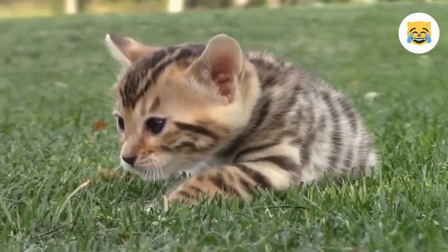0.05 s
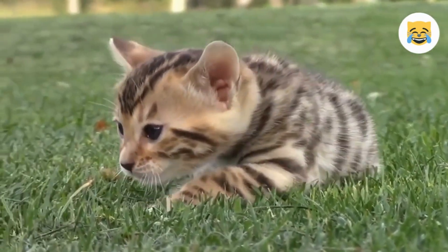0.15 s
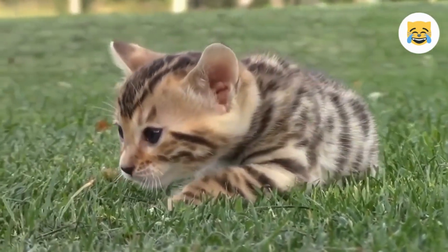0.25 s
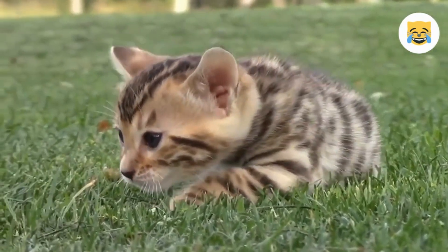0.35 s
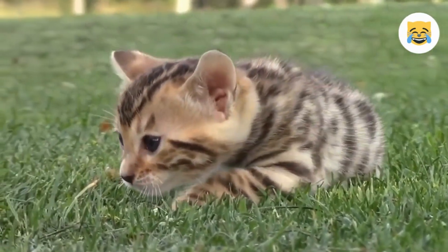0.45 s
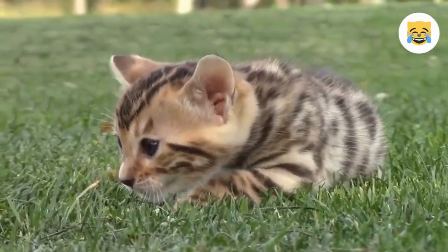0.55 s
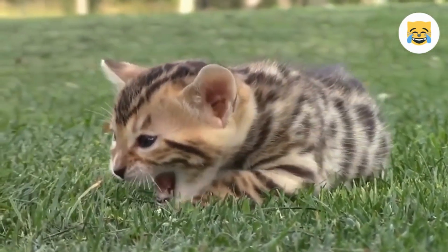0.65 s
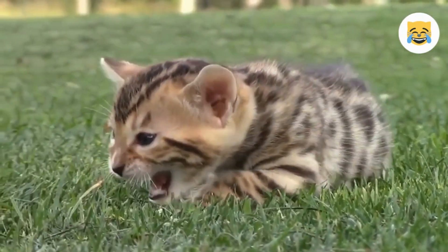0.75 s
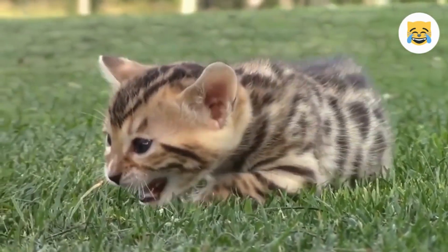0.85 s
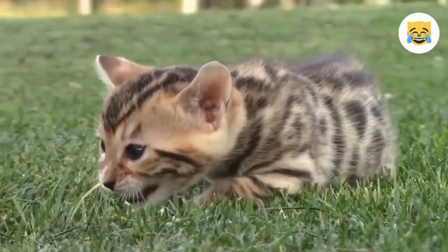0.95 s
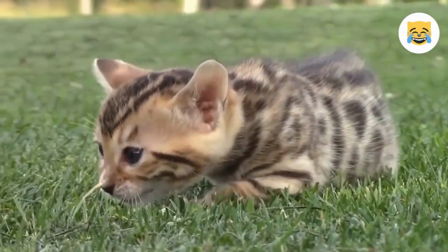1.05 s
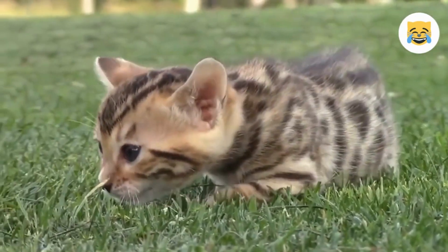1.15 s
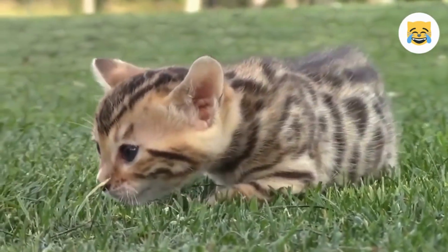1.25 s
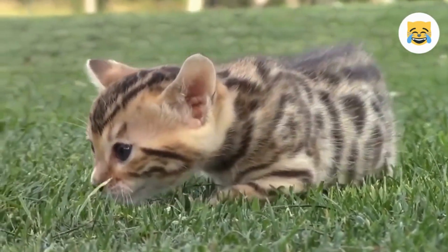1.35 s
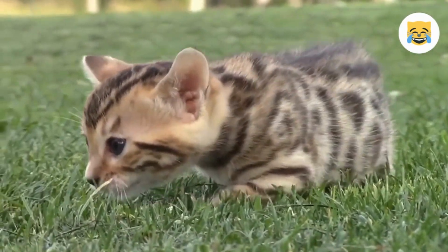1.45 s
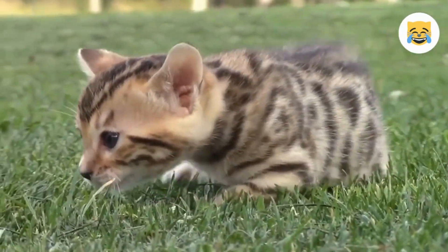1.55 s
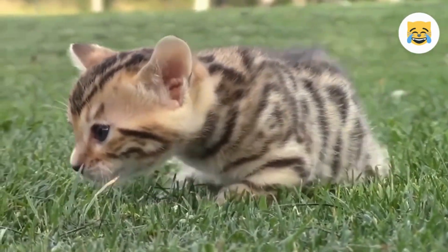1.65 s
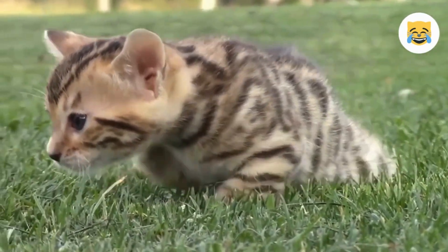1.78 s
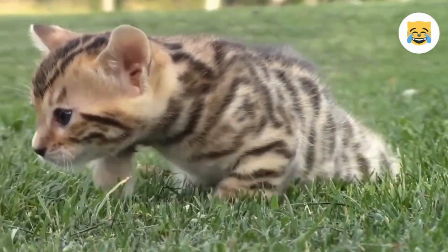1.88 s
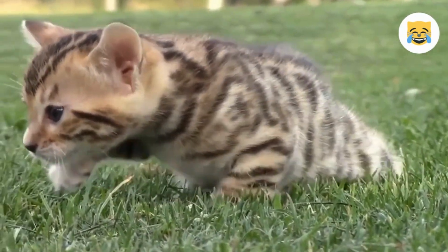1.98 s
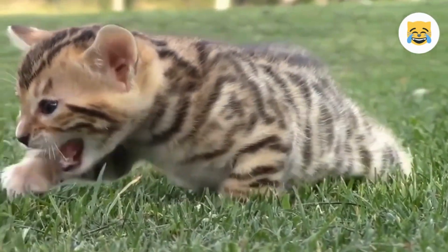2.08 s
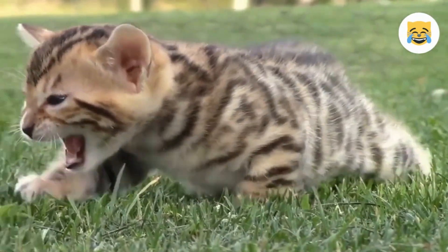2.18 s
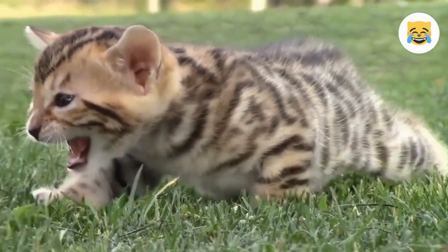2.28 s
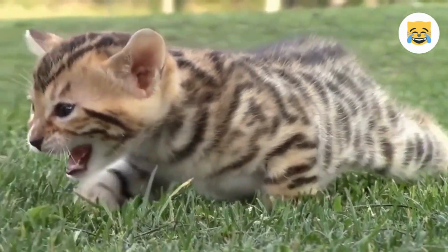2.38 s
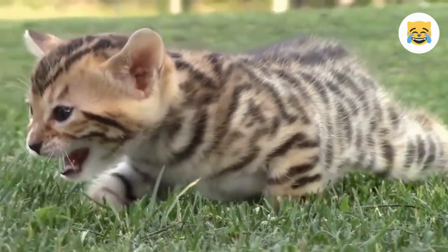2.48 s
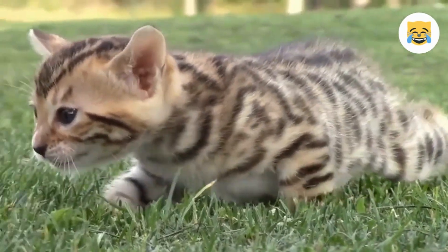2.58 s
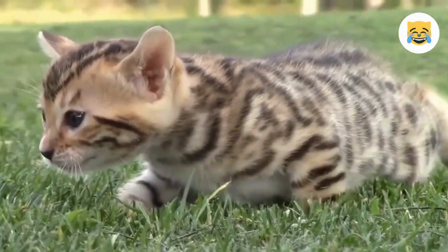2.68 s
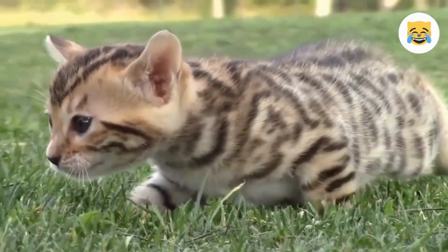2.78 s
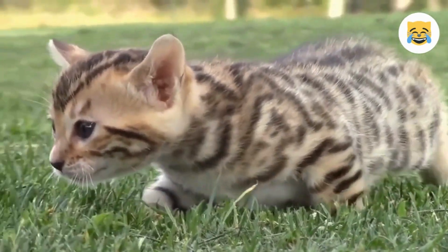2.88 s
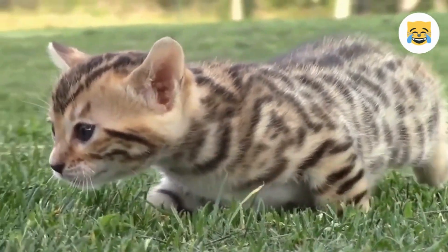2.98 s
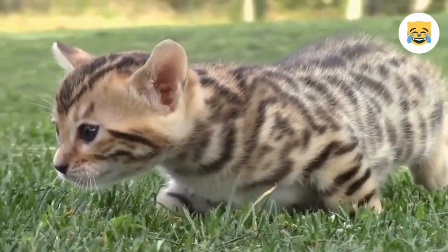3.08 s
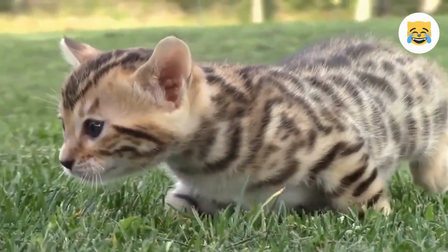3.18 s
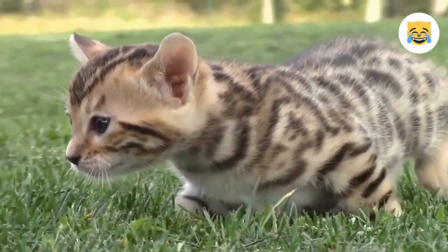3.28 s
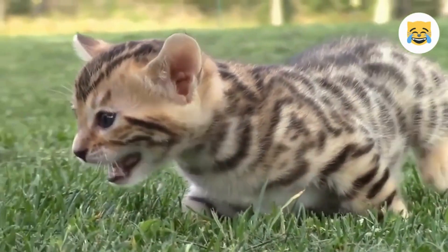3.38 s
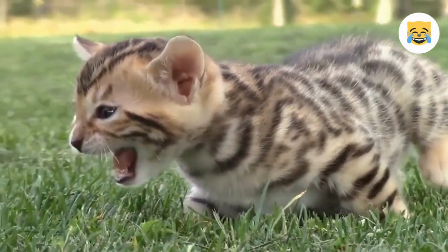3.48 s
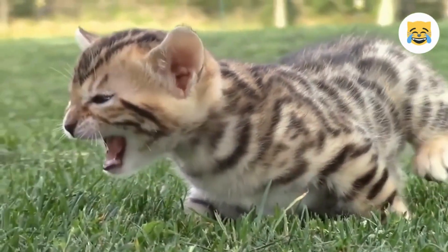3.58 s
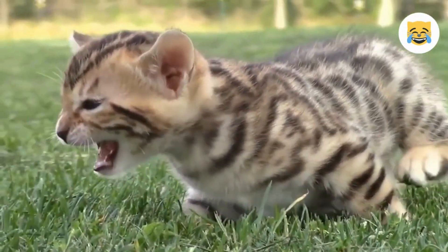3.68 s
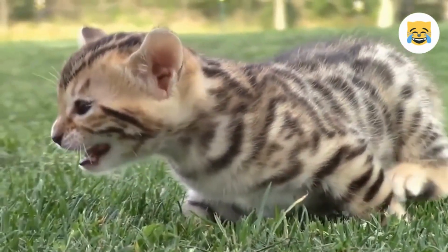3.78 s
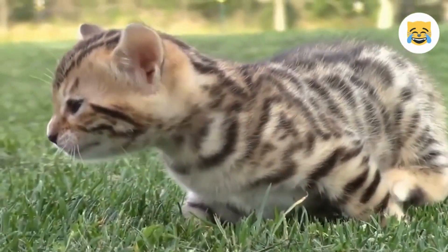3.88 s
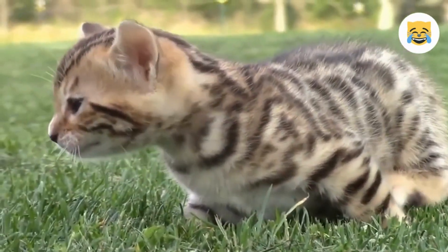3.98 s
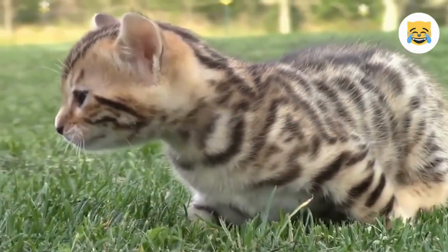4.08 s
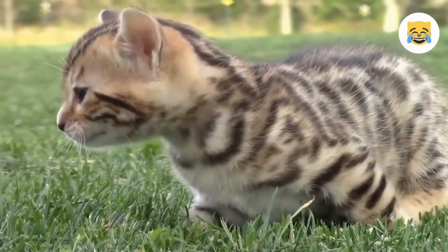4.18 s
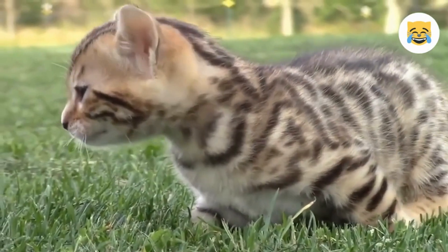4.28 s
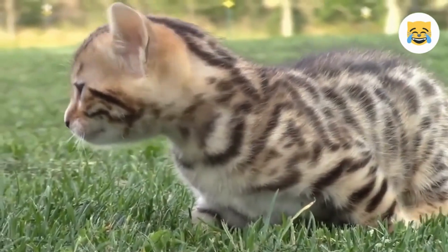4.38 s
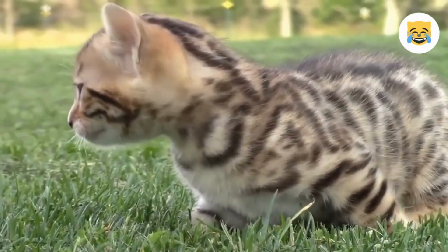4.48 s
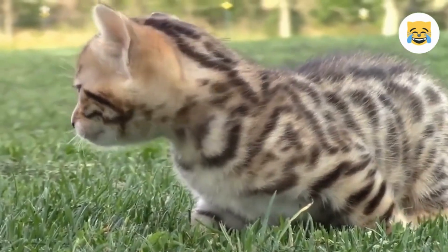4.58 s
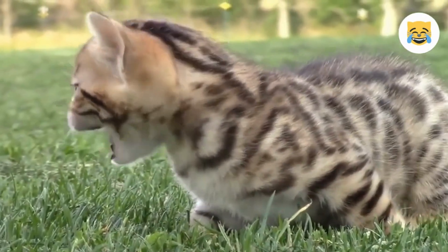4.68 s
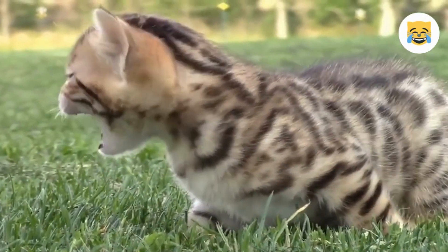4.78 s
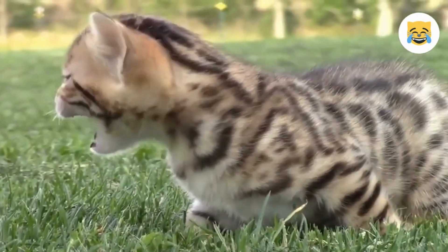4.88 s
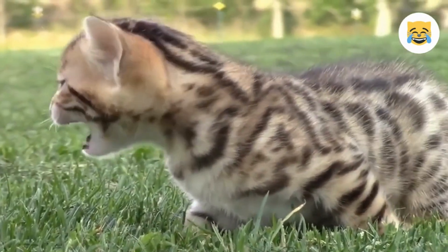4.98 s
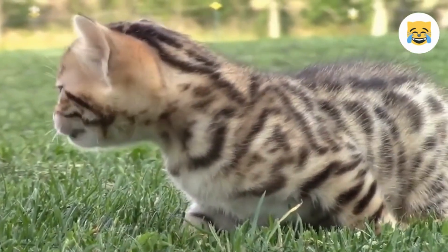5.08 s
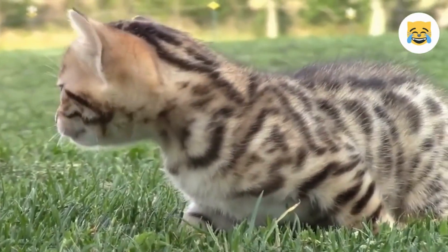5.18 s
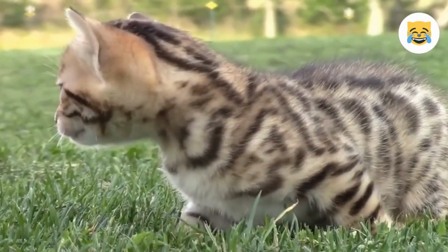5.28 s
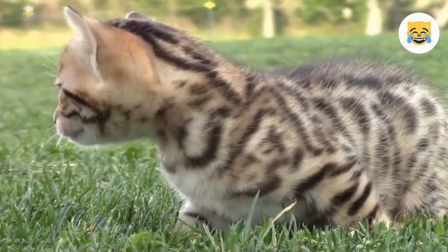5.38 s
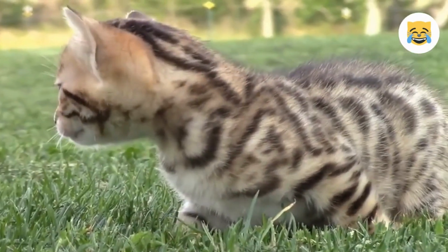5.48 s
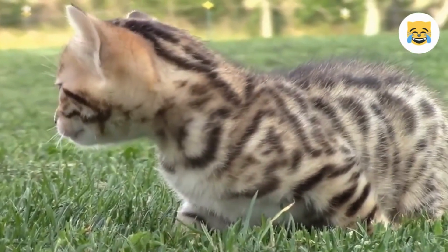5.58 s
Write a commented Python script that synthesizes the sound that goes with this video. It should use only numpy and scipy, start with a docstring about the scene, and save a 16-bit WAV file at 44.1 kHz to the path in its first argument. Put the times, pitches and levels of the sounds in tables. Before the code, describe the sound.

Outdoors, a tiny cat mews shrilly four times near the microphone, the last cracking, with quiet traffic rumble, a cooing dove and small birds behind.

```python
"""On a lawn, a kitten meows four times close by, over far traffic, an engine drone, a dove and small birds with echoes.
The kitten's voice is nearly a pure tone: a mouth resonance falls through each call and lifts first the
second partial (twice the pitch), then the first. Breath noise, slips of the folds and a crack roughen it.
Birds and dove are gliding or wavering sines, apart from one buzzy whistle and one hoarse cheep of filtered noise.
Traffic is random noise with a shaped, drifting spectrum, and the drone is a narrow band of noise."""
import sys
import numpy as np
from scipy import signal
from scipy.io import wavfile
from scipy.ndimage import uniform_filter1d

SR = 44100
rng = np.random.default_rng(int(sys.argv[2]) if len(sys.argv) > 2 else 0)


def generate_wav(sig):
    """Save sig (samples, or channels by samples) to the path in sys.argv[1] as 16-bit PCM at SR."""
    pcm = np.round(np.clip(np.atleast_2d(sig).T, -1, 1) * 32767).astype(np.int16)
    wavfile.write(sys.argv[1], SR, pcm)


N = 248724


def amp(db):
    """Gain of a level in dB."""
    return 10 ** (np.asarray(db) / 20)


def evened(x):
    """Scales to rms 1 (an average strength of one)."""
    return x / np.sqrt(np.mean(x ** 2) + 1e-20)


def read(points, hz):
    """Reads a spectrum on a log-frequency axis."""
    f, value = np.transpose(points)
    return np.interp(np.log(hz + 1), np.log(f + 1), value)


def curves_at(rows, t):
    """Reads the columns of a curve table at the times t."""
    s, *columns = np.transpose(rows)
    return [np.interp(t, s, c) for c in columns]


def unroll(rows):
    """Sample times and columns of a curve table."""
    t = np.arange(max(rows[0][0], 0), rows[-1][0], 1 / SR)
    return (t, *curves_at(rows, t))


def add(mix, s, sound):
    """Mixes a sound in at a time."""
    part = mix[max(round(s * SR), 0):][:len(sound)]
    part += sound[:len(part)]


def resonate(x, hz, width):
    """Shifts the curve hz down to zero, smooths twice, and shifts back: a steep moving resonance."""
    turn = np.exp(2j * np.pi * np.cumsum(hz * np.ones(len(x))) / SR)
    r = np.exp(-np.pi * width / SR)
    smooth = signal.lfilter([(1 - r) ** 2], [1, -2 * r, r * r], x / turn)
    return 2 * (turn * smooth).real


def noise_band(count, hz, width):
    """Noise of rms 1 through a resonance at hz."""
    return evened(resonate(rng.standard_normal(count), hz, width))


def wander(count, seconds):
    """Slow chance of rms 1."""
    size = max(round(seconds * SR), 1)
    return evened(uniform_filter1d(uniform_filter1d(rng.standard_normal(count), size), size))


def tone(hz, db):
    """A sine of rms level db along a pitch curve."""
    return np.sqrt(2) * amp(db) * np.sin(2 * np.pi * np.cumsum(hz) / SR)


# colour of the traffic, before overall leveling: [f/Hz, level/dB per Hz]
TRAFFIC_COLOUR = [(15, -68.5), (25, -36.5), (48, -34.5), (77, -11.5), (164, -6), (221, -4.5), (379, -8),
                  (523, -5.5), (567, -10), (826, -15.5), (1200, -22.5), (5150, -32), (7500, -37),
                  (15500, -54)]
# width of the traffic, difference between the ears against what they share: [f/Hz, level/dB]
TRAFFIC_WIDTH = [(60, -18), (240, -20), (950, -11), (3770, -6.5), (15000, -5.5)]
# loudness of the traffic: [t/s, level/dB]
TRAFFIC_LEVEL = [(0, -50), (2, -49.5), (4.999, -49), (5.64, -47.5)]


def traffic(patchy_db=2.5):
    """Random short-time spectra with drifting patches; the ears share most of the bass, less of the treble."""
    frames, hz = N // 1024 + 5, np.fft.rfftfreq(4096, 1 / SR)
    a, b, c, d, patches = rng.standard_normal((frames, 2049, 5)).T
    patches = uniform_filter1d(patches, size=20, axis=0)  # across frequency
    patches = evened(uniform_filter1d(patches, size=4, axis=1))  # across time
    mid = a + 1j * b
    side = (c + 1j * d) * amp(read(TRAFFIC_WIDTH, hz))[:, None]
    colour = amp(read(TRAFFIC_COLOUR, hz)[:, None] + patchy_db * patches)
    z = np.array([mid + side, mid - side]) * colour
    rumble = signal.istft(z, nperseg=4096, noverlap=3072)[1][:, :N]
    level_db, = curves_at(TRAFFIC_LEVEL, np.arange(N) / SR)
    return amp(level_db) * evened(rumble)


# far engine: [t/s, f/Hz, level/dB]
ENGINE = [(0, 214, -49), (.7, 222, -56.5), (1.2, 227, -66), (3.3, 225.9, -64), (5.64, 223.8, -52)]


def engine_drone():
    """A far engine: a narrow band of noise that follows a slow pitch curve."""
    out = np.zeros(N)
    t, hz, db = unroll(ENGINE)
    add(out, t[0], amp(db) * noise_band(len(t), hz, 45))
    return out


# soft coos, before their swell and wavering: [t/s, length/s, f/Hz, level/dB]
COOS = [(0, 0.96, 515, -61), (.7, 0.34, 515, -53.5), (1.3, 0.19, 512, -54.5), (1.55, 0.48, 514, -45.5),
        (2.3, 0.35, 514, -51), (1.899, 0.9, 476, -59), (3.4, 0.54, 476, -54.5), (5.149, 0.22, 430, -51.5)]


def dove():
    """Coos: sines that swell and fade while pitch and level waver a little."""
    out = np.zeros(N)
    for s, length, hz, db in COOS:
        swell = np.hanning(round(length * SR))
        wavering_hz = hz * (1 + .006 * wander(len(swell), 0.057))
        wavering_db = db + 1.3 * wander(len(swell), 0.026)
        add(out, s, swell * tone(wavering_hz, wavering_db))
    return out


# Bird levels below are before fades, flutter and placing between the ears.
# twitter, notes that rise and fall: [t/s, length/s, top f/Hz, level/dB]
ARCHES = [(.212, .018, 3730, -59), (1.791, 0.013, 3970, -61), (3.394, 0.014, 3830, -57.5),
          (0.137, 0.06, 4830, -58.5), (0.228, 0.045, 4440, -56.5), (1.085, 0.064, 4590, -60.5),
          (1.17, .035, 4298, -53.5), (1.643, 0.019, 3750, -57), (2.512, 0.026, 4110, -53.5),
          (2.576, 0.0461, 4930, -57.5), (2.66, 0.037, 3980, -58), (5.026, 0.039, 4210, -54.5)]
ARCH_FOOT_HZ, ARCH_SKEW = 3550, 1.35  # a skew above 1 puts the top after the middle
# a high bird's falling notes: [t/s, level/dB]
HIGH_NOTES = [(.364, -64), (.629, -56), (0.827, -54.5), (1.024, -54.5), (1.211, -56)]
HIGH_S, HIGH_START_HZ, HIGH_END_HZ = .05, 8690, 7420
# faint level bird notes: [t/s, length/s, f/Hz, level/dB]
LEVEL_NOTES = [(1.548, 0.041, 4630, -64), (1.573, 0.014, 5170, -59), (2.34, .09, 4230, -65.5),
               (4.472, 0.15, 4000, -69.5)]
# twitter, quick falling strokes: [t/s, start f/Hz, level/dB]
STROKES = [(1.747, 5100, -63), (1.803, 5280, -60), (1.815, 4630, -73), (3.349, 5020, -61),
           (3.36, 5440, -58.5), (3.402, 4990, -65.5), (3.416, 5430, -59.5), (3.426, 4945, -60),
           (5.069, 4960, -56), (5.077, 5050, -60), (5.115, 4890, -56.5), (5.131, 5210, -58),
           (5.142, 4900, -55)]
STROKE_S, STROKE_FALL = .016, .74  # length; end pitch as a share of the start


def twitter():
    """Small birds: near-sine notes that arch, fall or stay level, with a fluttering strength."""
    notes = []
    for s, length, top_hz, db in ARCHES:
        arch = np.sin(np.pi * np.linspace(0, 1, round(length * SR)) ** ARCH_SKEW)
        notes.append((s, ARCH_FOOT_HZ + (top_hz - ARCH_FOOT_HZ) * arch, db))
    for s, db in HIGH_NOTES:
        notes.append((s, np.geomspace(HIGH_START_HZ, HIGH_END_HZ, round(HIGH_S * SR)), db))
    for s, length, hz, db in LEVEL_NOTES:
        notes.append((s, np.full(round(length * SR), hz), db))
    for s, hz, db in STROKES:
        notes.append((s, np.geomspace(hz, STROKE_FALL * hz, round(STROKE_S * SR)), db))
    out = np.zeros(N)
    for s, hz, db in notes:
        flutter = 1 + 0.4 * wander(len(hz), 0.0014)
        add(out, s, tone(hz, db) * flutter * signal.windows.tukey(len(hz), .7))
    return out


# trill of paired pips: s = first t/s, every = t/s between pairs, pair = t/s within a pair,
# first_hz and last_hz = middle f/Hz of the first and last pips
TRILL = dict(s=1.2935, every=.0645, pair=.015, first_hz=6500, last_hz=6300)
# each pair of the trill: [level/dB]
PAIR_LEVELS = [-52, -57, -61, -53, -54.5, -56]


def trill():
    """Pairs of short pips; each pip slides up by three percent."""
    out = np.zeros(N)
    pitches = np.linspace(TRILL["first_hz"], TRILL["last_hz"], len(PAIR_LEVELS))
    for k, hz in enumerate(pitches):
        pip = tone(np.linspace(.985 * hz, 1.015 * hz, round(0.014 * SR)), PAIR_LEVELS[k])
        for late in (0, TRILL["pair"]):
            add(out, TRILL["s"] + k * TRILL["every"] + late, pip * np.hanning(len(pip)))
    return out


# one long buzzy note: [t/s, f/Hz, level/dB]
WHISTLE = [(1.68, 6900, -62), (1.72, 7100, -64.5), (1.9, 7320, -71.5), (2.12, 7370, -70)]


def buzzy_whistle():
    """Noise through a narrow resonance that follows the pitch of the note."""
    out = np.zeros(N)
    t, hz, db = unroll(WHISTLE)
    add(out, t[0], amp(db) * noise_band(len(t), hz, 250) * signal.windows.tukey(len(t), .1))
    return out


def garden(x, t60=0.28):
    """Echoes from hedges and walls: a noise tail, other for each ear, that dies by 60 dB in t60 seconds."""
    t = np.arange(SR // 2) / SR
    tail = rng.standard_normal((2, len(t))) * amp(-60 * t / t60) * (t > .006)
    return signal.fftconvolve(x[None], tail / np.linalg.norm(tail[0]), axes=1)[:, :N]


def tent(octaves, nearing_db, leaving_db):
    """Loss in dB at a distance in octaves before or after a resonance."""
    return np.where(octaves < 0, nearing_db * octaves, -leaving_db * octaves)


# the folds slip to another setting and stay there: [t/s, pitch factor, level step/dB]
SLIPS = [(.903, 0.99, 0), (2.391, 1.0, 2), (3.707, 1.0085, 0.5), (1.001, 1.052, -5.5), (1.03, 0.93, 0),
         (1.043, 1.106, -5), (1.071, 0.88, 5), (1.126, 0.931, -2), (2.228, 0.97, 2.5), (2.633, 0.89, 4)]
SLIP_S = .003


def slip_folds(t, hz, effort_db):
    """Steps pitch and effort at each slip that falls inside this meow."""
    for s, factor, step_db in SLIPS:
        slipped = np.clip((t - s) / SLIP_S + .5, 0, 1) * (s > t[0])
        hz, effort_db = hz * factor ** slipped, effort_db + step_db * slipped
    return hz, effort_db


# the high partials: [partial number, level/dB against the swell]
HIGH_PARTIALS = [(5, -11), (6, -1), (7, 1.5), (8, -12)]
# lights each high partial that crosses it: [f/Hz, width/Hz, level/dB against the swell]
THROAT = (8300, 600, 3)
SHINE_DB_PER_S = 190  # the high partials swell to a top and fade
FAN_TILT_DB = -5  # dB per partial in the rich opening


def high_partials(t, hz, effort_db, since, high_s, high_db, fan, smear):
    """Partials that swell once and glow in a throat resonance, each with a halo of breath."""
    out = np.zeros(len(t))
    throat_hz, throat_width, throat_db = THROAT
    for k, partial_db in HIGH_PARTIALS:
        throat = amp(throat_db + effort_db - effort_db.max())
        throat = throat / (1 + (2 * (k * hz - throat_hz) / throat_width) ** 2) ** 2
        shine = throat + amp(-SHINE_DB_PER_S * abs(t - high_s))
        shine = shine * amp(high_db + partial_db + 4.5 * wander(len(t), .012))
        shine = shine * (1 - np.exp(-(since / .009) ** 2))  # gone for a moment at the crack
        shine = shine + fan * amp(FAN_TILT_DB * (k - 2))
        out += shine * smear[k - 3] * tone(k * hz, 0)
        out += shine * .3 * noise_band(len(t), k * hz, 900)
    return out


# strong and weak cycles alternate: [t/s, length/s, level/dB of the line at 3/2 of the pitch, before its gate]
DOUBLING = [(0.897, 0.023, -54), (2.207, 0.028, -52), (3.537, 0.073, -56), (4.794, .12, -48.5)]


def alternating_cycles(t, hz):
    """Strong and weak cycles in turn give lines half-way between the partials."""
    out = np.zeros(len(t))
    for s, length, db in DOUBLING:
        u = (t - s) / length
        gate = np.clip(u * 5, 0, 1) * np.clip((1 - u) * 4, 0, 1)
        if gate.any():
            lines = tone(3 * hz / 2, db) + tone(5 * hz / 2, db - 11)
            out += gate * lines * (.8 + 0.14 * wander(len(t), 0.002))
    return out


# the voice cracks and a lower vibration sets in, levels before its roughness:
# [t/s, f/Hz, level/dB, level/dB of its sum tone with the voice]
BREAK = [(4.931, 995, -33.5, -33), (4.942, 869.5, -29.5, -35.5), (4.97, 869, -34.5, -40.5),
         (5.004, 857, -36.5, -48.5), (5.022, 857.6, -45.5, -51)]


def lower_vibration(t, hz):
    """A second vibration of the voice, with its sum and difference tones, all ragged."""
    low_hz, low_db, sum_db = curves_at(BREAK, t)
    lower = tone(low_hz, low_db) + tone(hz - low_hz, low_db - 24)
    lower = lower + tone(hz + low_hz, sum_db) + tone(2 * hz - low_hz, sum_db - 2.5)
    lower = lower + tone(2 * hz + low_hz, sum_db - 18.5)
    ragged = 1 + 0.25 * wander(len(t), 0.0017)
    return lower * ragged * np.clip((t - BREAK[0][0]) / 0.0028, 0, 1) * (t < BREAK[-1][0])


# the tone breaks off for an instant with a snap: [t/s, f/Hz, level/dB before its fade]
CRACK = (4.937, 1900, -29)
NEARING_DB_PER_OCT, LEAVING_DB_PER_OCT = 29, 24.5  # lift of the first partial around the resonance
LET_GO_DB, LET_GO_PITCH = -7.5, 1.0204  # step as the resonance leaves the second partial
SETTLE_DB = -13.5  # step of the second partial as the resonance meets the first
SECOND_GROWTH = 1.3  # dB of resting second partial for each dB of effort
THIRD_DB, FOURTH_DB = -49, -10  # third below the first; fourth below the third
THIRD_DB_PER_OCT = 13.5
FAN_S = .11  # length of the opening of a meow, rich in partials


def meow(rows, mouth):
    """Partials on one pitch curve, weighed by a mouth resonance that falls one octave, plus breath."""
    t, hz, effort_db = unroll(rows)
    (second_s, first_s, second_top_db, rise_db, fall_db, resting_db, lift_db, breath_db, third_db,
     fan_second_db, fan_db, high_s, high_db) = mouth
    count = len(t)
    hz = uniform_filter1d(hz, round(.012 * SR), mode="nearest")  # muscles round the turns of pitch
    hz, effort_db = slip_folds(t, hz, effort_db)
    fallen = (t - second_s) / (first_s - second_s)  # octaves the resonance has fallen
    let_go = np.clip((t - second_s) / (2 * SLIP_S) + .5, 0, 1)
    hz = hz * LET_GO_PITCH ** let_go * (1 + .001 * wander(count, .004))  # slight unsteadiness of the folds
    since = t - CRACK[0] - .0012
    restart = (since > 0) * np.exp(-np.maximum(since, 0) / 0.0017)
    hz = hz * (1 + 0.1 * restart)  # the tone restarts sharp

    lift = 1 + amp(lift_db + tent(fallen - 1, NEARING_DB_PER_OCT, LEAVING_DB_PER_OCT))
    first_db = uniform_filter1d(effort_db + 20 * np.log10(lift), round(0.0056 * SR), mode="nearest")
    first_db = first_db - 10.0 * np.exp(-(since / 0.00096) ** 2)  # brief dip at the crack
    opening = np.sin(np.pi * np.clip((t - t[0]) / FAN_S, 0, 1))
    fan = amp(fan_db) * opening

    near_second_db = uniform_filter1d(tent(fallen, rise_db, fall_db), round(.009 * SR), mode="nearest")
    settle_db = SETTLE_DB * np.clip((t - first_s) / (5 * SLIP_S) + 0.68, 0, 1)
    second = amp(second_top_db + near_second_db + LET_GO_DB * let_go + settle_db)
    resting = amp(resting_db + SECOND_GROWTH * (effort_db - effort_db.max()))
    # the resting part is opposite in phase, so the partial dips where the two match
    second = second - resting + amp(fan_second_db) * opening
    third = amp(third_db + tent(fallen, THIRD_DB_PER_OCT, THIRD_DB_PER_OCT) + LET_GO_DB * let_go)
    third = third + amp(first_db + THIRD_DB) + fan

    out = tone(hz, .2 * wander(count, .006) + first_db)
    out += second * tone(2 * hz, .9 * wander(count, .004))
    smear = .7 + .5 * np.array([wander(count, .003) for _ in range(6)])  # breath blurs the weak partials
    out += third * smear[0] * tone(3 * hz, 0)
    fourth = tone(4 * hz, FOURTH_DB + 3.0 * wander(count, .015))
    out += third * smear[1] * np.clip(hz / 1450, 0, 1) ** 3 * fourth
    out += high_partials(t, hz, effort_db, since, high_s, high_db, fan, smear)
    out += amp(.5 * first_db - 61) * noise_band(count, 5700, 6000)  # air noise grows with effort
    out += alternating_cycles(t, hz) + lower_vibration(t, hz)
    breath = noise_band(count, 2 * hz / 2 ** np.clip(fallen, 0, 1), 520)  # heard in the resonance
    out += amp(breath_db) * breath * np.sin(np.pi * np.clip((fallen + 0.48) / 1.9, 0, 1)) ** 4
    return t[0], out * signal.windows.tukey(count, .03)


# air past the teeth as the mouth opens: [t/s, length/s, level/dB before its swell]
HISS = [(2.136, 0.13, -59), (3.475, .11, -60), (4.8, 0.24, -63)]


def teeth_hiss(length, db):
    """Air hisses past the teeth: uneven high noise that swells and fades."""
    count = round(length * SR)
    air = noise_band(count, 10800, 4800) * amp(3 * wander(count, .003))
    return amp(db) * evened(air) * np.hanning(count)


def crack_snap(hz, db):
    """A burst of noise around hz that starts fast and dies quickly."""
    t = np.arange(round(.03 * SR)) / SR
    return amp(db - 60 * t / 0.033) * np.minimum(t / 0.0013, 1) * noise_band(len(t), hz, 700)


# one table a meow, before slips and the resonance: [t/s, pitch f/Hz, effort level/dB]
MEOWS = [
    [(0.632, 641, -53), (0.664, 826, -41.5), (0.704, 1330, -42.5), (0.725, 1553, -33.5),
     (0.76, 1718, -32.5), (0.81, 1476, -32), (0.86, 1371, -33), (0.912, 1434, -29.5), (1.06, 1222, -22.5),
     (1.124, 1063, -23.5), (1.188, 733, -35)],
    [(2.128, 755, -48.5), (2.16, 1256, -42), (2.192, 1688, -34), (2.228, 1764, -32.5), (2.316, 1471, -33),
     (2.4, 1581, -28.5), (2.515, 1412, -28), (2.592, 1372, -33), (2.63, 1202, -33.5), (2.665, 919, -45.5),
     (2.712, 862, -53)],
    [(3.46, 682, -46.5), (3.505, 1260, -45), (3.525, 1510, -32.5), (3.545, 1696, -31.5), (3.62, 1504, -29),
     (3.665, 1524, -27.5), (3.716, 1614, -27), (3.76, 1482, -23.5), (3.852, 1341, -26), (3.916, 1041, -28),
     (3.944, 810, -37), (3.988, 693, -50.5)],
    [(4.735, 970, -31.5), (4.757, 1408, -53), (4.78, 1602, -34), (4.815, 1597, -34.5), (4.85, 1605, -28.5),
     (4.943, 1704, -29.5), (4.98, 1566, -21.5), (5.06, 1418, -24.5), (5.135, 851, -38), (5.175, 880, -54)],
]
# the mouth in each meow, parts before they are combined: [resonance at second partial t/s, at first partial t/s,
# second partial top level/dB, its rise/dB per octave, its fall/dB per octave, its resting level/dB,
# lift of the first/dB, breath level/dB, third partial level/dB, opening second partial level/dB,
# opening third partial level/dB, top of the high partials t/s, their level/dB]
MOUTH = [(0.813, 0.894, -21.5, 35.3, 16, -51, 11.4, -54, -59.5, -53, -50, .8, -72),
         (2.282, 2.394, -25.5, 39.95, 9.9, -51.5, 15.66, -53, -67.5, -47.5, -54, 2.39, -60),
         (3.622, 3.716, -19, 40.5, 20, -54, 18.6, -50.5, -52, -52, -51, 3.72, -54.5),
         (4.856, 4.942, -19.5, 35.19, 32, -53.5, 20.4, -44.5, -41.5, -42.5, -68, 4.91, -52)]
# a tone lingers in the mouth resonance and beats with the second partial: [t/s, length/s, f/Hz, level/dB before fades]
HELD = (4.858, .065, 3200, -43)


def kitten():
    """The meows, the hiss of the opening mouth, the crack and the lingering tone."""
    out = np.zeros(N)
    for rows, mouth in zip(MEOWS, MOUTH):
        add(out, *meow(rows, mouth))
    for s, length, db in HISS:
        add(out, s, teeth_hiss(length, db))
    s, hz, db = CRACK
    add(out, s, crack_snap(hz, db))
    s, length, hz, db = HELD
    count = round(length * SR)
    add(out, s, tone(np.full(count, hz), db) * np.hanning(count) ** .5)
    return out


# one hoarse note: [t/s, length/s, start f/Hz, end f/Hz, level/dB before fades]
CHEEP = (4.252, 0.048, 1340, 1220, -59)


def hoarse_cheep():
    """Noise around the second and third partial of a falling pitch."""
    out = np.zeros(N)
    s, length, start_hz, end_hz, db = CHEEP
    hz = np.linspace(start_hz, end_hz, round(length * SR))
    hoarse = sum(noise_band(len(hz), k * hz, 350) for k in (2, 3))
    add(out, s, amp(db) * evened(hoarse) * signal.windows.tukey(len(hz), .6))
    return out


def scene():
    """Kitten in the middle, birds a little aside with their echoes, over the background."""
    background = traffic() + engine_drone() + dove() + hoarse_cheep()
    birds = twitter() + trill() + buzzy_whistle()
    far = birds * amp([[1.2], [-1.2]]) + amp(-4.0) * garden(birds)
    cat = kitten()
    near = cat * amp([[.05], [-.05]]) + amp(-53.5) * garden(cat, t60=0.22)
    return near + far + background


EDGE_HZ = 15660


def record(dry):
    """The band limit of the recorder: a steep filter removes what lies above the edge."""
    low_pass = signal.firwin(511, EDGE_HZ, window=("kaiser", 9), fs=SR)
    return signal.oaconvolve(dry, low_pass[None], "same")


dry = scene()
out = record(dry)
generate_wav(out)
```